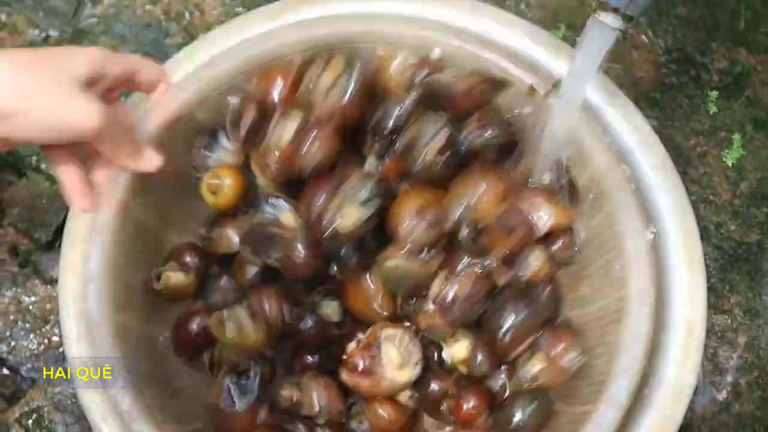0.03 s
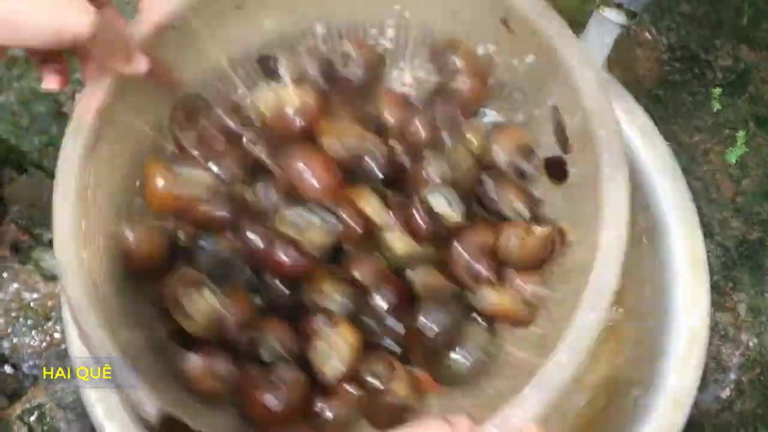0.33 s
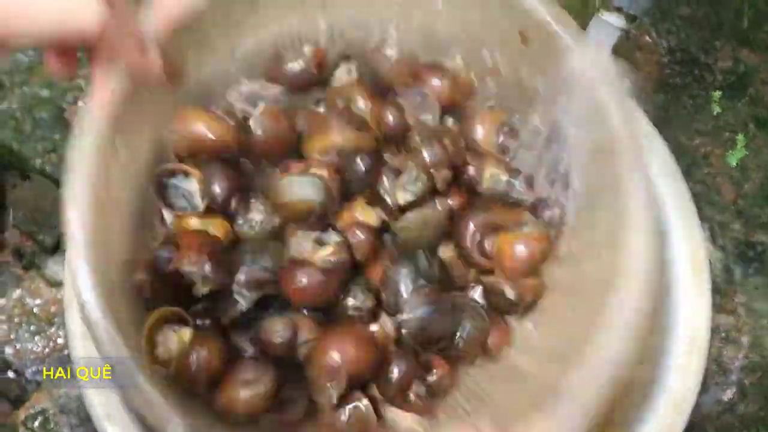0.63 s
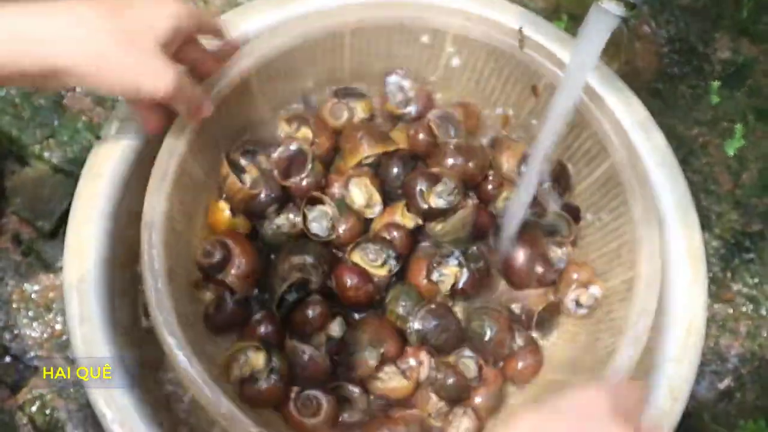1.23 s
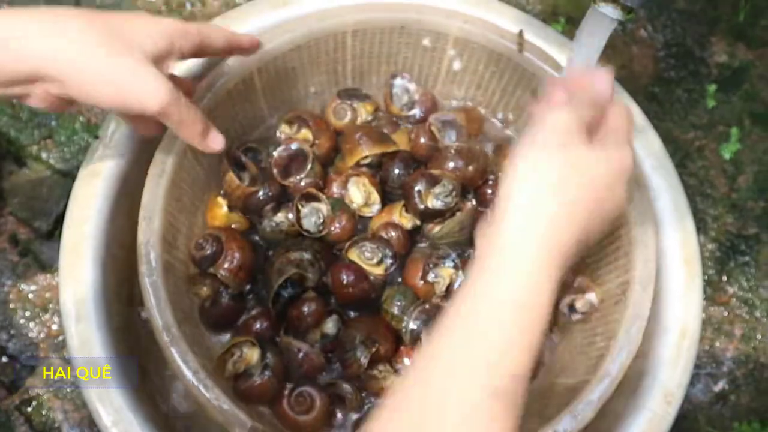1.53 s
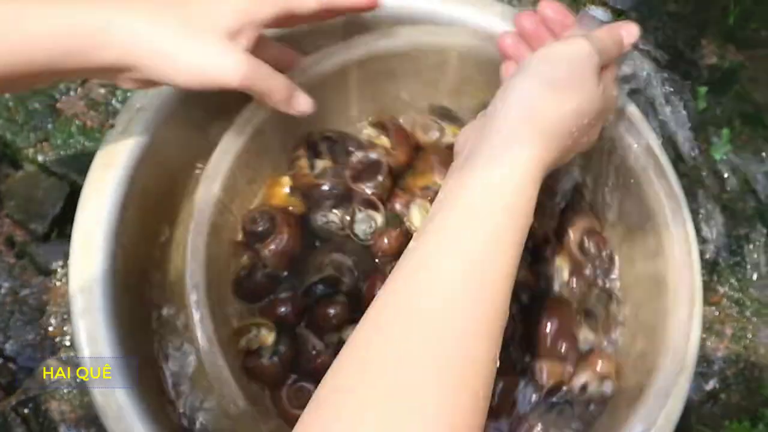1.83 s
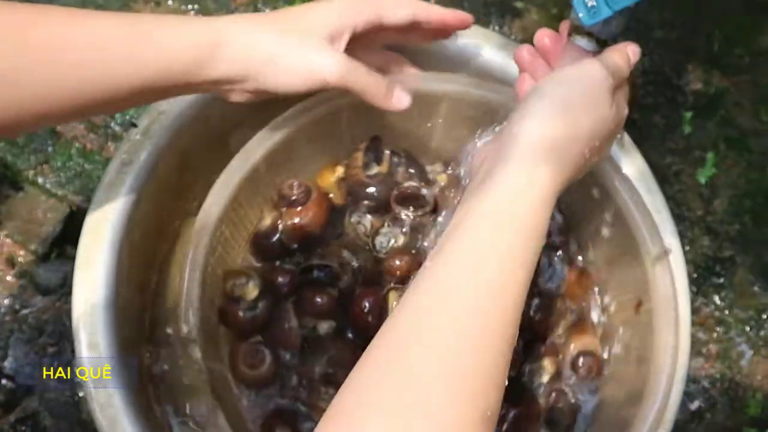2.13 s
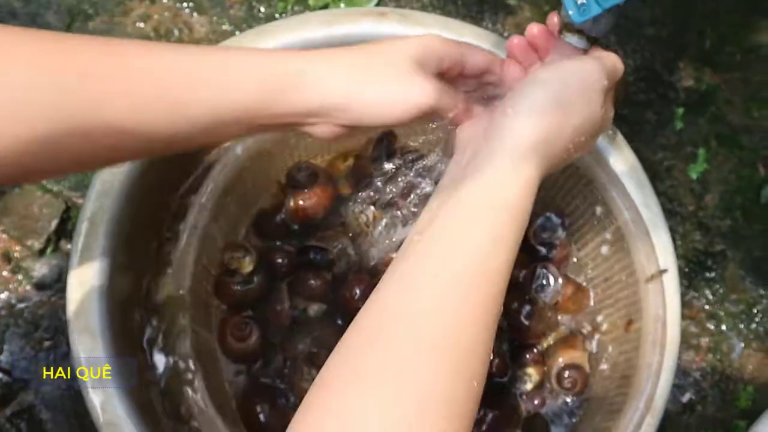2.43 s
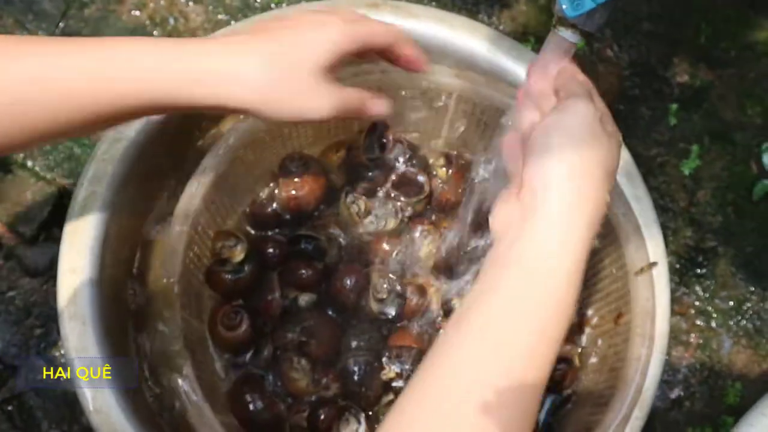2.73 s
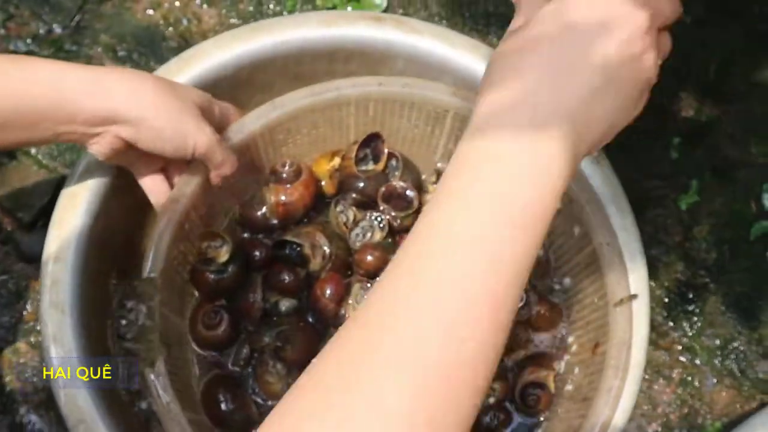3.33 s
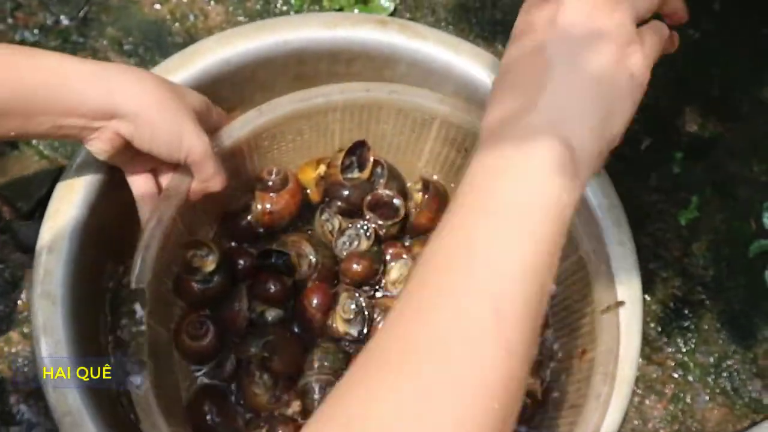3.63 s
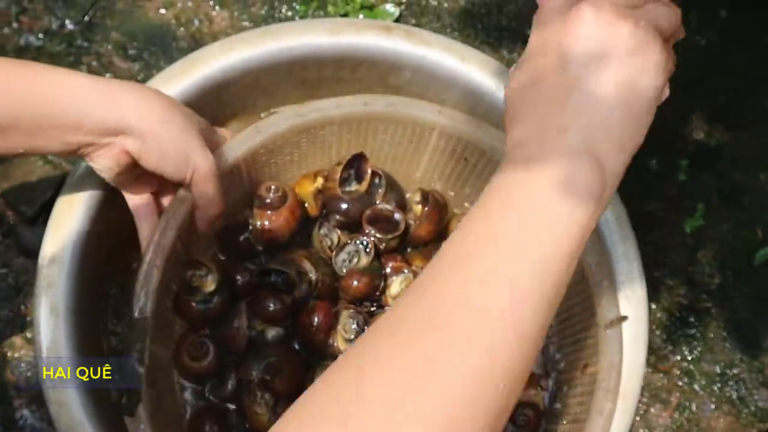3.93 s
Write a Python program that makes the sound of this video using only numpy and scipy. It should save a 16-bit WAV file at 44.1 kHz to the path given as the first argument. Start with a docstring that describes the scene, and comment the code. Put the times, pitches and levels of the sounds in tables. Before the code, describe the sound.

Wet snail shells rattle in a shaken colander, then hose water splashes over them.

```python
"""Wet snail shells are shaken in a plastic colander standing in a metal basin, close by, outdoors.
After about a second the heap settles and the colander knocks down. A hose then runs over the shells
and through a cupped hand: drops spatter, bubbles ring in the pool, a hollow gurgle follows the hand,
and the jet draws a low, throbbing hum from the basin."""
import sys
import numpy as np
from scipy import signal
from scipy.io import wavfile
from scipy.ndimage import uniform_filter1d

SR = 44100
rng = np.random.default_rng(int(sys.argv[2]) if len(sys.argv) > 2 else 0)


def wav_record(signal):
    """Record a signal, one row per channel, as 16-bit PCM in the file named by sys.argv[1]."""
    frames = np.transpose(np.atleast_2d(signal))
    bounded = np.clip(frames, -1, 1)
    # unit amplitude maps onto the largest positive 16-bit level
    quanta = np.round(bounded * 32767).astype(np.int16)
    wavfile.write(sys.argv[1], SR, quanta)


N = 176400
T = np.arange(N) / SR  # clock of the whole scene, in seconds
RING = np.arange(4096) / SR  # clock of one short sound

# tone of water hitting the hand: f/Hz, level/dB
HAND_TONE = [(100, -30), (400, -13), (750, -21), (1400, -4), (2000, 3), (2600, 1), (3200, 4.5), (4100, -4),
             (5000, -4.5), (6300, -12.5), (8500, -16.5), (12000, -24), (15000, -36)]
# tone of water hitting shells and pool: f/Hz, level/dB
SPLASH_TONE = [(100, -61), (400, 2), (800, -6.5), (1400, -4), (1950, -8), (2300, -0.5), (2900, -7),
               (3450, 0.5), (4500, -1.5), (6300, -1.5), (8500, -9.5), (12000, -14.5), (15000, -19)]
# tone of bright shell clicks: f/Hz, level/dB
CLICK_TONE = [(500, -44), (2500, -13), (4600, 1), (6200, 2), (8500, -9.5), (11000, -15), (15000, -17)]


def amp(db):
    """Turns decibels into a gain."""
    return 10 ** (np.asarray(db) / 20)


def unit(x):
    """Scales a sound to an average power of 1."""
    return x / np.sqrt(np.mean(x ** 2) + 1e-20)


def steadied(x, size=700):
    """Holds the power near 1 over stretches of `size` samples, keeping the fine grain."""
    power = uniform_filter1d(uniform_filter1d(x ** 2, size), size)
    return x / np.sqrt(abs(power) + 1e-12)


def curve(points, column=1):
    """Joins the values in one column of a time table with straight lines."""
    rows = np.array(points)
    return np.interp(T, rows[:, 0], rows[:, column])


def add(mix, s, sound):
    """Mixes a sound in, starting at s seconds."""
    part = mix[max(0, round(s * SR)):][:len(sound)]
    part += sound[:len(part)]


def colour(x, tone, size=8192):
    """Filters a sound to a tone (f/Hz, level/dB), with no ringing ahead of a hit."""
    hz, db = np.transpose(tone)
    log_hz = np.log(abs(np.fft.fftfreq(size, 1 / SR)) + 1)
    log_gain = np.log(amp(np.interp(log_hz, np.log(hz), db)))
    response = np.exp(np.conj(signal.hilbert(log_gain)))
    taps = np.fft.ifft(response).real[:size // 2]
    return signal.fftconvolve(x, taps)[:len(x)]


def dying(t60):
    """A fade that drops 60 dB in t60 seconds."""
    return np.exp(-np.log(1000) * RING / t60)


def clicks(per_s, spread_db):
    """Random hits, mostly small and a few large."""
    size = amp(spread_db * np.minimum(rng.exponential(1, N), np.pi))
    return size * rng.choice([-1, 1], N) * (rng.random(N) < per_s / SR)


def grains(hits, shapes):
    """Each hit sets off one short sound, picked at random from the shapes."""
    which, out = rng.integers(0, len(shapes), N), np.zeros(N + len(RING))
    shapes = [shape / np.linalg.norm(shape) for shape in shapes]
    for i in np.flatnonzero(hits):
        out[i:i + len(RING)] += hits[i] * shapes[which[i]]
    return out[:N]


def crack(decay_s):
    """A brief burst of noise as two things touch."""
    return rng.standard_normal(len(RING)) * np.exp(-RING / decay_s)


def bubble(hz, cycles, rise):
    """A fading tone that climbs as the bubble nears the surface."""
    age = RING * hz / cycles
    pitch = hz * (1 + rise * np.minimum(age, 2))
    return np.exp(-age) * np.sin(2 * np.pi * np.cumsum(pitch) / SR)


def outdoor_air(db=-60.5):
    """A faint, steady, low rush behind everything."""
    # tone of the background: f/Hz, level/dB
    tone = [(20, -21), (60, -12), (200, -17.5), (800, -24), (4000, -38.5), (15000, -46)]
    return amp(db) * unit(colour(rng.standard_normal(N), tone))


def basin_hum(waver_depth=0.3):
    """The jet rumbles on the water-laden basin and makes its two low notes hum in swells."""
    # swells of the hum: middle t/s, length/s, level at the middle/dB, f/Hz
    swells = [(1.33, .16, -55, 136), (1.53, .2, -52, 160.2), (1.66, .18, -49, 162.7),
              (1.98, .16, -57, 163.4), (2.13, .18, -56.5, 131.2), (2.25, .12, -56, 161),
              (2.38, .12, -58, 164), (2.49, .13, -49.5, 155.3), (2.68, .28, -45.5, 161.2),
              (2.82, .14, -50, 131.2), (2.96, .18, -48, 160.5), (3.16, .26, -56, 160),
              (3.33, .2, -51, 159.8), (3.58, .18, -49, 134.3), (3.7, .28, -49, 161.6), (3.7, .12, -47, 130),
              (3.92, .17, -50.5, 134.8)]
    # strength of the rumble: t/s, level/dB
    rumble_levels = [(0, -69), (1.2, -57.5), (1.6, -55), (1.78, -55), (1.85, -47.5), (2.15, -51),
                     (2.45, -50), (2.68, -49.5), (3.1, -47.5), (3.48, -51.5), (3.67, -46.5), (3.8, -53),
                     (4, -51)]
    # tone of the rumble: f/Hz, level/dB
    rumble_tone = [(15, -55), (32, -18), (54, -1.5), (72, -7), (95, -6.5), (135, 0.5), (180, 0), (215, -11),
                   (400, -26.5), (1500, -54)]
    hum = np.zeros(N)
    for s, length, db, hz in swells:
        t = np.arange(0, length, 1 / SR)
        note = np.sqrt(2) * np.sin(2 * np.pi * (hz * t + rng.random()))
        add(hum, s - length / 2, amp(db) * np.sin(np.pi * t / length) * note)
    waver = unit(uniform_filter1d(uniform_filter1d(rng.standard_normal(N), size=900), size=900))
    rumble = steadied(colour(rng.standard_normal(N), rumble_tone), size=5000)
    return hum * (1 + waver_depth * waver) + amp(curve(rumble_levels)) * rumble


def bobbing(rise_s=0.0086):
    """Soft low glugs as the colander shifts in the water."""
    # glugs: t/s, level/dB, f/Hz
    glugs = [(0.681, -43, 123), (1.832, -39.5, 108), (1.86, -40.5, 79), (1.99, -38, 101),
             (2.01, -43.5, 295), (2.07, -40.5, 407), (3.04, -46, 359)]
    swell = RING / rise_s * np.exp(1 - RING / rise_s)
    out = np.zeros(N)
    for s, db, hz in glugs:
        add(out, s, amp(db) * swell * np.sin(2 * np.pi * hz * RING))
    return out


def churn(cycles=2.5, splash_gain=0.17):
    """Water falling into the pool traps larger bubbles, with a few clear plops."""
    # strength of the churning: t/s, level/dB
    levels = [(0, -65), (1.3, -49), (1.61, -57.5), (1.7, -39), (1.87, -40.5), (1.93, -45.5), (2.02, -40),
              (2.2, -45), (2.33, -55), (2.43, -56), (2.47, -42.5), (2.54, -63), (2.87, -53), (2.91, -43.5),
              (3.1, -49.5), (3.6, -48.5), (3.8, -46), (3.88, -47.5), (3.91, -66), (4, -46.5)]
    # tone of the churning: f/Hz, level/dB
    tone = [(50, -11), (130, 2), (240, -16), (400, -6.5), (600, -7), (830, -0.5), (1100, -6), (1600, -11.5),
            (3000, -35), (9000, -63)]
    # single large bubbles: t/s, level/dB, f/Hz
    plops = [(1.70, -25.5, 940), (1.781, -21, 915), (1.992, -19, 963), (2.085, -26, 1350),
             (2.231, -22, 2120), (2.252, -21.5, 1090), (2.296, -23, 1006), (2.329, -24.5, 1400),
             (2.367, -21, 2020), (2.387, -24.5, 1280), (2.522, -29.5, 1080), (2.593, -26.5, 1150),
             (2.658, -25.5, 1330), (2.822, -22.5, 1640), (2.912, -26, 1560), (2.958, -31, 770),
             (2.978, -24.5, 2250), (3.006, -25, 824), (3.052, -30, 1090), (3.161, -22.5, 1610),
             (3.266, -21.5, 1610), (3.424, -23.5, 966), (3.79, -25.5, 802)]
    shapes = [bubble(hz, cycles * rng.uniform(0.35, 1.77), rise=0.028)
              for hz in np.linspace(250, 2400, 80)]
    bubbling = colour(grains(clicks(per_s=1500, spread_db=3.5), shapes), tone)
    out = amp(curve(levels)) * steadied(bubbling, size=3500)
    for s, db, hz in plops:
        splash = splash_gain * colour(crack(0.0046), SPLASH_TONE)
        add(out, s, amp(db) * (bubble(hz, cycles=6.8, rise=0.007) / 2 + splash))
    return out


def gurgle(pitch_scatter=0.036, overtone_ratio=1.62, overtone_db=-7):
    """Bubbles pop near the pitch of an air pocket, which changes as the hand moves."""
    # air pocket under the jet, between hand and shells: t/s, f/Hz, level/dB
    pocket = [(1.3, 1640, -85), (1.38, 1690, -63), (1.42, 1710, -48), (1.555, 1570, -55), (1.59, 1530, -58),
              (2.05, 1327, -50), (2.22, 1330, -46), (2.34, 1400, -56), (2.4, 1300, -40), (2.46, 1100, -75),
              (2.53, 1106, -47), (2.59, 1054, -47), (2.62, 1334, -48.5), (2.73, 1310, -50.5),
              (2.78, 1640, -43), (2.83, 1600, -48), (2.87, 1320, -46.5), (2.94, 1370, -44.5),
              (3.03, 1430, -66), (3.11, 1380, -49), (3.17, 1555, -44.5), (3.27, 1640, -47),
              (3.31, 1390, -44.5), (3.44, 1335, -51.5), (3.52, 1550, -48), (3.58, 1670, -48),
              (3.66, 1270, -57), (3.77, 1490, -43), (3.9, 1370, -80)]
    pitch, out = curve(pocket), np.zeros(N)
    for ratio, db in ((1, 0), (overtone_ratio, overtone_db)):
        hits, pops = clicks(per_s=150, spread_db=2), np.zeros(N)
        for i in np.flatnonzero(hits):
            hz = ratio * pitch[i] * np.exp(pitch_scatter * rng.standard_normal())
            add(pops, i / SR, hits[i] * bubble(hz, cycles=9.5, rise=0.017))
        out += amp(db) * steadied(pops, size=2600)
    return out * amp(curve(pocket, column=2))


def slaps(decay_s=0.0059):
    """Gobs of water burst into a quick spray of droplets."""
    # gobs landing: t/s, peak level/dB
    gobs = [(1.913, -30), (1.994, -28), (2.183, -37), (2.251, -35), (2.455, -25), (2.544, -30),
            (2.629, -25), (2.938, -28), (2.981, -34), (3.175, -26), (3.297, -32), (3.337, -28),
            (3.456, -28.5), (3.581, -28.5), (3.616, -30)]
    spray = colour(clicks(per_s=5000, spread_db=4), HAND_TONE)
    out = np.zeros(N)
    for s, db in gobs:
        burst = np.roll(spray, -round(s * SR))[:len(RING)] * np.exp(-RING / decay_s)
        add(out, s, amp(db) * burst / abs(burst).max())
    return out


def droplets(flow, cycles=13, db=-4.8):
    """Larger drops plink out of the spray, louder when the flow is stronger."""
    shapes = [bubble(hz, cycles * rng.uniform(0.54, 1.3), rise=0.012)
              for hz in np.geomspace(1500, 4800, 60)]
    plinks = colour(grains(clicks(per_s=115, spread_db=3), shapes), SPLASH_TONE)
    return amp(db) * flow * unit(plinks)


def spatter(cycles=7.5, fizz_db=-3, spurt_db=2.5):
    """Drops tick on skin, shells and pool in uneven spurts and trap tiny, fizzing bubbles."""
    # strength of the spray: t/s, level on the hand/dB, level on shells and pool/dB
    levels = [(0, -59, -85), (1.0, -47.5, -49.5), (1.19, -50.5, -49.5), (1.33, -51.5, -48.5),
              (1.42, -50.5, -50.5), (1.55, -47, -44.5), (1.61, -50, -50), (1.7, -43, -45),
              (1.95, -43.5, -48.5), (2.17, -42, -43), (2.42, -41.5, -47.5), (2.6, -45.5, -44.5),
              (2.86, -49, -48), (2.94, -59, -43.5), (3.09, -78, -46.5), (3.18, -65, -41), (3.4, -52, -45),
              (3.62, -64, -43), (3.78, -47, -47.5), (3.86, -78, -46), (3.895, -73, -56), (3.96, -75, -56),
              (4, -58, -85)]
    on_hand, on_shells = amp(curve(levels)), amp(curve(levels, column=2))
    shapes = [bubble(hz, cycles * rng.uniform(0.57, 2.0), rise=0.019)
              for hz in np.geomspace(1200, 13000, 240)]
    out = np.zeros(N)
    for level, tone in ((on_hand, HAND_TONE), (on_shells, SPLASH_TONE)):
        fizz = unit(grains(clicks(per_s=2600, spread_db=4.5), shapes))
        spurts = amp(spurt_db * unit(uniform_filter1d(rng.standard_normal(N), size=500)))
        drops = unit(clicks(per_s=4200, spread_db=2.5))
        spray = spurts * (drops + amp(fizz_db) * fizz)
        out += level * steadied(colour(spray, tone), size=2500)
    return out + droplets(flow=np.hypot(on_hand, on_shells))


def colander_ring(detune=0.009):
    """The colander rings, struck at a random place and put slightly out of tune by its load."""
    # natural notes of the colander: f/Hz, level/dB, time to fade by 60 dB/s
    notes = [(416, 0.5, 0.025), (514, -6, 0.048), (639, 4, 0.02), (774, 1.5, 0.026), (933, 4.5, 0.017),
             (1046, -1.5, 0.053), (1355, -0.5, 0.021), (1830, 4.5, 0.017), (2200, -1, 0.028),
             (3390, 17.5, 0.0022)]
    out = np.zeros(len(RING))
    for hz, db, t60 in notes:
        strength = rng.normal(1, 0.14) * rng.choice([-1, 1]) * amp(db)
        out += strength * dying(t60) * np.cos(2 * np.pi * hz * rng.normal(1, detune) * RING)
    return out


def colander_knocks(crack_gain=5, spot_db=12.5):
    """The colander knocks on the basin; each struck spot brings out its own pitch."""
    # knocks: t/s, peak level/dB, f of the spot/Hz, decay of the contact noise/s
    knocks = [(.045, -14, 780, 0.0043), (.113, -16, 760, 0.0048), (.202, -22, 890, 0.0048),
              (.496, -17, 1100, 0.0061), (.65, -20.5, 776, 0.0067), (1.0, -23.5, 760, 0.0034),
              (1.043, -25.5, 1400, 0.0075), (1.227, -26, 1710, 0.014), (1.23, -20.5, 450, 0.0098),
              (1.277, -30.5, 1300, 0.014), (1.442, -31.5, 800, 0.0019), (1.841, -25, 1100, 0.0046),
              (1.864, -26.5, 700, 0.006), (2.467, -27.5, 600, .003), (3.006, -25.5, 900, 0.0018),
              (3.049, -46, 1100, .005), (3.979, -33, 570, 0.0079)]
    # tone shared by all knocks: f/Hz, level/dB
    tone = [(60, -31), (250, -15), (420, -1), (900, -3.5), (1700, -3), (3600, -6.5), (6000, -16),
            (15000, -46)]
    out = np.zeros(N)
    for s, db, hz, contact_s in knocks:
        blow = colour(colander_ring() + crack_gain * crack(contact_s), tone)
        blow = colour(blow, [(hz / np.sqrt(2), 0), (hz, spot_db), (hz * np.sqrt(2), 0)])
        add(out, s, amp(db) * blow / abs(blow).max())
    return out


def shell_clacks(t60=0.018, tick_gain=0.085):
    """Single shells drop onto the heap, each with a tick and a short ring."""
    # falling shells: t/s, level/dB, f/Hz
    clacks = [(0.0842, -11, 4270), (.098, -5.5, 2220), (0.134, -4, 4530), (.201, -10.5, 2540),
              (0.238, -11.5, 5050), (0.382, -16, 8530), (.4035, -19, 5800), (.501, -14, 9040),
              (0.565, -3, 4040), (0.679, -20, 7000), (0.739, -12.5, 3830), (0.7656, -19, 3940),
              (0.792, -14, 6100), (0.895, -19, 5400), (0.976, -22, 3320), (0.988, -15.5, 3700),
              (1.044, -22, 2640), (1.069, -19, 1730), (1.11, -22, 1830), (1.13, -21, 2560),
              (1.386, -21, 3740), (3.05, -19.5, 6100), (3.745, -20, 3470)]
    # notes of one shell: multiple of its pitch, level/dB
    notes = [(.83, -2), (1, 4.5), (1.13, -8)]
    out = np.zeros(N)
    for s, db, hz in clacks:
        tick_tone = [(hz / 10, -20), (hz / 2, -3), (hz, 0), (hz * 2, -15), (hz * 4, -30)]
        tick = colour(crack(0.0027), tick_tone)
        chord = sum(amp(note_db) * np.sin(2 * np.pi * hz * ratio * RING) for ratio, note_db in notes)
        ring = dying(t60) * chord / abs(chord).max() / 2
        add(out, s, amp(db) * (ring + tick_gain * tick / abs(tick).max()))
    return out


def shell_crunches(t60=0.008, tick_gain=0.26):
    """Shell edges snap against each other in the hardest shakes."""
    # crunches: loudest t/s, spread/s, level/dB
    crunches = [(.09, 0.033, -38.5), (.405, 0.011, -34.5), (.55, 0.021, -38.5), (.685, 0.018, -41.5),
                (.8, 0.04, -44.5)]
    edges = [dying(t60) * np.sin(2 * np.pi * hz * RING) / 2 + tick_gain * crack(0.0027)
             for hz in np.linspace(5000, 14000, 40)]
    level = sum(amp(db) * np.exp(-((T - s) / spread) ** 2 / 2) for s, spread, db in crunches)
    snaps = grains(clicks(per_s=1100, spread_db=5.5), edges)
    return level * steadied(colour(snaps, CLICK_TONE))


def shell_ring(t60=0.015, tick_gain=0.34):
    """One struck shell ticks and rings at five random pitches."""
    fade = dying(t60 * rng.uniform(0.29, 1.43))
    pitches_hz = rng.uniform(674, 15050, size=5)
    chord = np.sin(2 * np.pi * np.outer(pitches_hz, RING)).mean(0)
    return fade * chord + tick_gain * crack(0.00042)


def shaking(bend=1.45, click_db=-10, brighten=0.58):
    """With each shake the shells clatter on each other and thump the colander."""
    # shakes: full strength at t/s, 20 dB rise/s, hold/s, 20 dB fall/s, clatter level/dB, thud level/dB
    shakes = [(0.017, 0.066, 0.007, 0.084, -31, -35.5), (0.058, 0.028, 0.042, 0.029, -20, -27.5),
              (0.122, 0.013, 0.0099, 0.11, -25.5, -37), (0.239, 0.025, 0.07, 0.018, -31.5, -35),
              (0.386, 0.066, 0.032, 0.061, -26, -28), (0.493, 0.018, 0.016, 0.038, -28, -28),
              (0.529, 0.022, 0.028, 0.051, -24, -26), (0.597, 0.034, .015, 0.036, -37.5, -40),
              (0.649, 0.05, 0.046, 0.046, -29, -26.5), (0.763, 0.03, .01, 0.05, -33, -32),
              (0.795, 0.026, 0.024, 0.058, -31.5, -31.5), (0.88, 0.017, 0.032, 0.046, -31.5, -32),
              (0.947, 0.016, 0.01, 0.012, -33.5, -42), (1.075, 0.0097, 0.012, 0.04, -42, -60)]
    # tone of the clattering shells: f/Hz, level/dB
    clatter_tone = [(60, -38), (300, -29), (700, -3.5), (1100, 1.5), (1600, -5), (2250, 2), (3100, 1),
                    (4000, 1), (5000, -7), (6200, -12), (8000, -20), (11000, -27.5), (15000, -36.5)]
    # tone of the thumped colander: f/Hz, level/dB
    thud_tone = [(30, -42), (80, -30), (135, -3.5), (230, -5.5), (370, -8), (520, -5), (760, -3.5),
                 (1000, -10.5), (1500, -3), (3000, -23), (9000, -35)]
    clatter_power, thud_power = np.zeros((2, N))
    for full, rise, hold, fall, clatter_db, thud_db in shakes:
        before = np.maximum(full - T, 0) / rise
        after = np.maximum(T - full - hold, 0) / fall
        shape_db = -20 * (before + after) ** bend
        clatter_power += amp(shape_db + clatter_db) ** 2
        thud_power += amp(shape_db + thud_db) ** 2
    shells = [shell_ring() for _ in range(140)]
    clatter = steadied(colour(grains(clicks(per_s=3000, spread_db=4), shells), clatter_tone))
    bright = steadied(colour(grains(clicks(per_s=800, spread_db=4), shells), CLICK_TONE))
    walls = [colander_ring() + 1.52 * crack(0.0054) for _ in range(140)]
    thud = steadied(colour(grains(clicks(per_s=700, spread_db=3), walls), thud_tone))
    force = np.sqrt(clatter_power)
    bright_share = amp(click_db) * force ** brighten  # harder shakes sound brighter
    return force * (clatter + bright_share * bright) + np.sqrt(thud_power) * thud


def with_echoes(x, t60=0.033, build_s=0.023, db=-13):
    """Adds short echoes from the basin walls and the ground."""
    tail = rng.standard_normal(len(RING)) * dying(t60) * np.minimum(RING / build_s, 1)
    return x + amp(db) * signal.fftconvolve(x, tail / np.linalg.norm(tail))[:N]


def stereo_side(x):
    """Many small reflections scramble the sound, so the ears hear the treble differently."""
    # stereo width: f/Hz, level of the scrambled sound/dB
    width = [(50, -86), (200, -28), (600, -56), (1400, -19.5), (2800, -14.5), (5600, -9.5), (10000, -3.5),
             (15000, -1)]
    spectrum = signal.stft(x, nperseg=256)[2]
    random_phase = np.exp(2j * np.pi * rng.random(spectrum.shape))
    scrambled = signal.istft(spectrum * random_phase, nperseg=256)[1][:N] * np.sqrt(2)
    return colour(scrambled, width)


def scene():
    """All sources sit in the middle; reflections widen the treble."""
    shells = shaking() + shell_crunches() + shell_clacks() + colander_knocks()
    water = spatter() + slaps() + churn() + gurgle()
    mid = with_echoes(shells + water) + bobbing() + basin_hum() + outdoor_air()
    side = stereo_side(mid)
    return np.array([mid + side, mid - side])


def record(dry, cutoff_hz=15650):
    """Cuts off the very highest treble."""
    lowpass = signal.firwin(511, cutoff_hz, window=("kaiser", 9), fs=SR)
    return signal.oaconvolve(dry, lowpass[None], "same")


dry = scene()
out = record(dry)
wav_record(out)
```